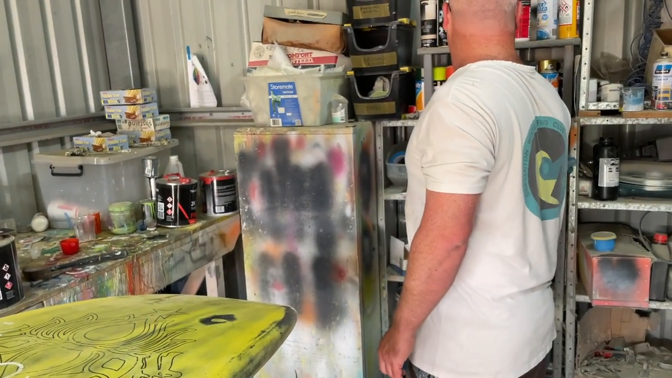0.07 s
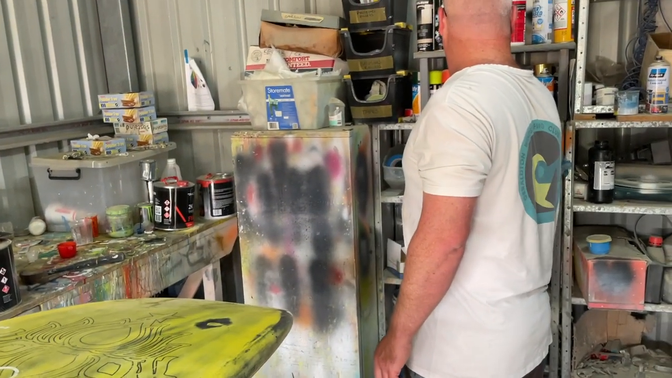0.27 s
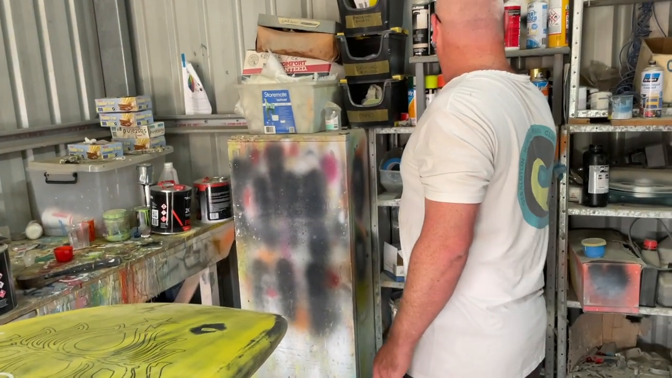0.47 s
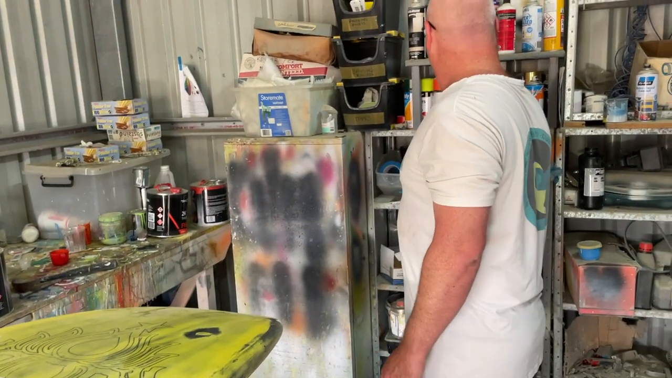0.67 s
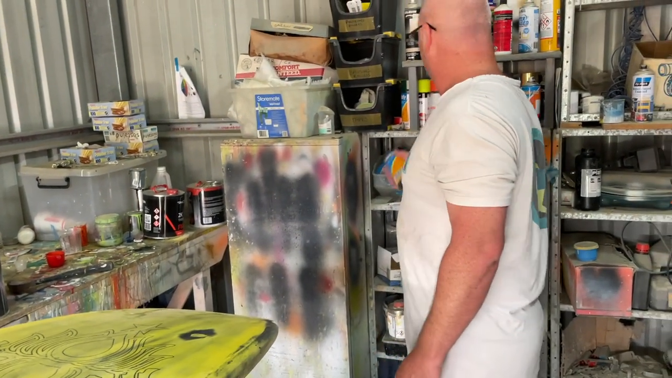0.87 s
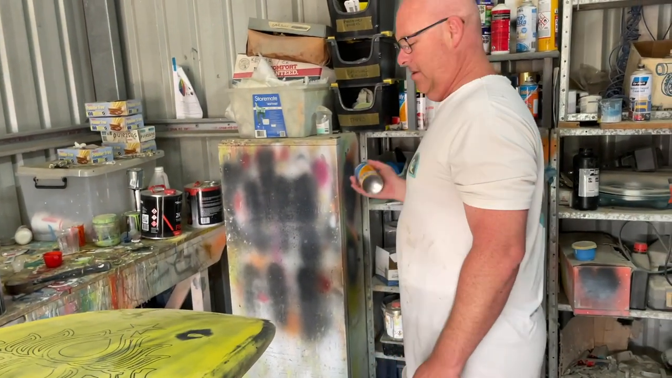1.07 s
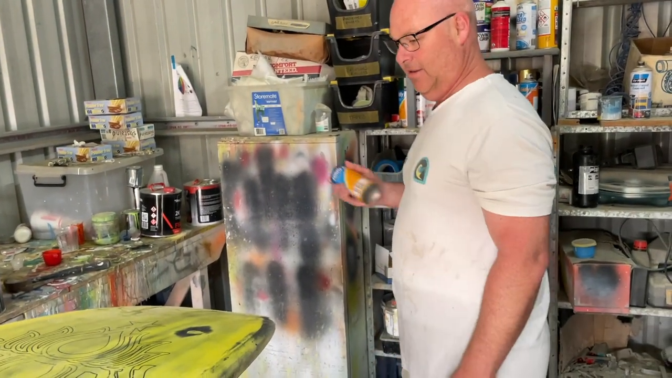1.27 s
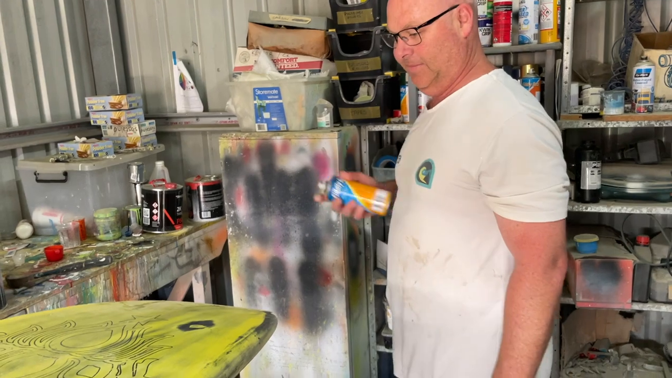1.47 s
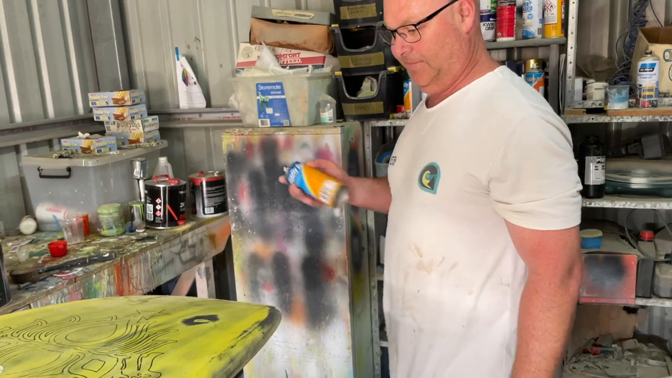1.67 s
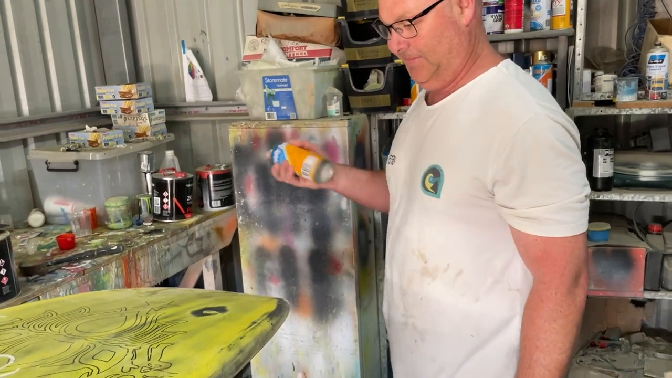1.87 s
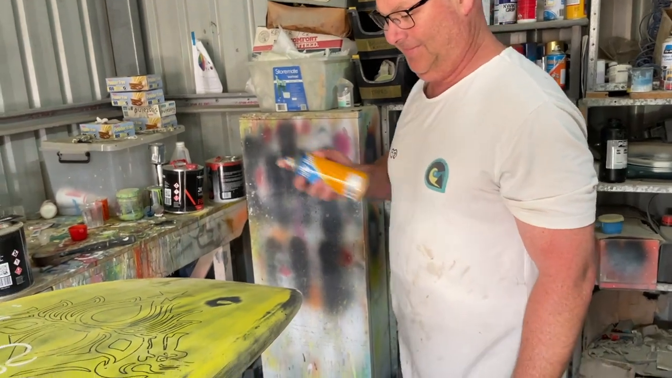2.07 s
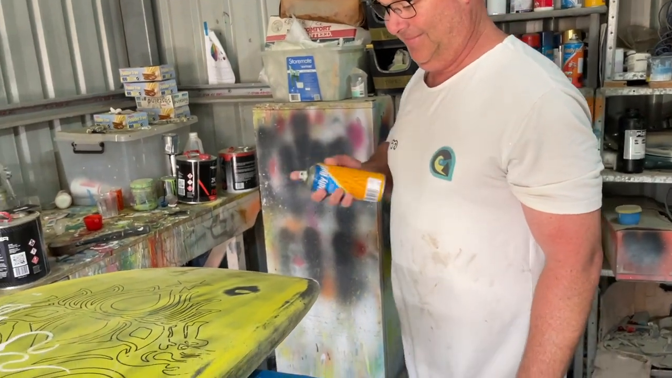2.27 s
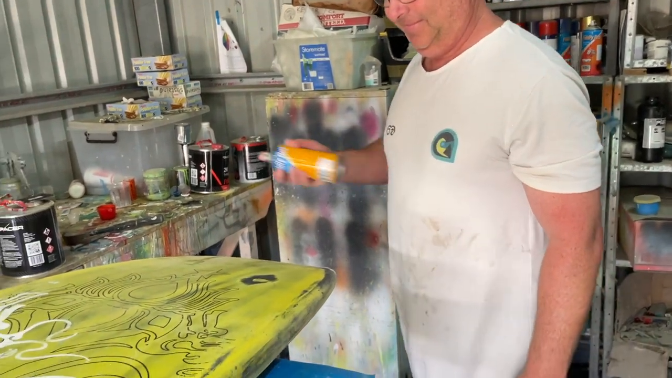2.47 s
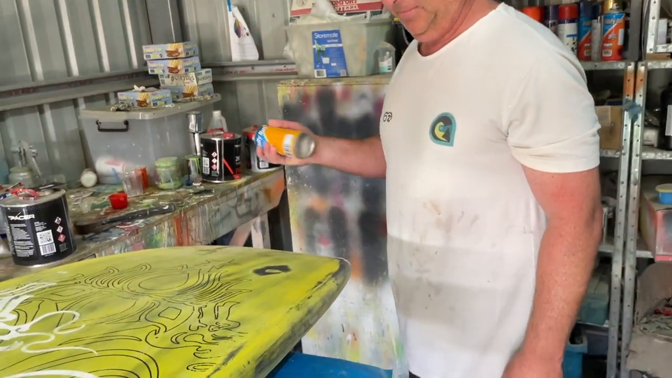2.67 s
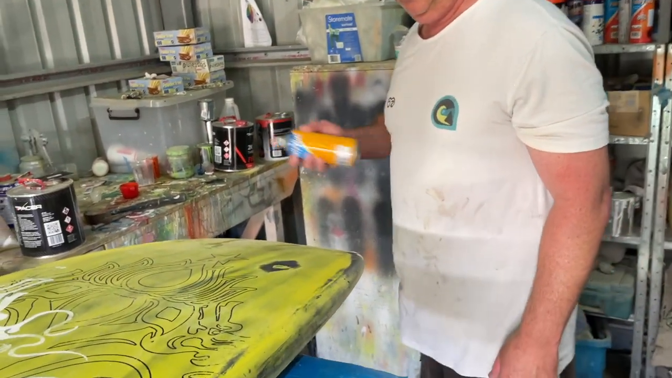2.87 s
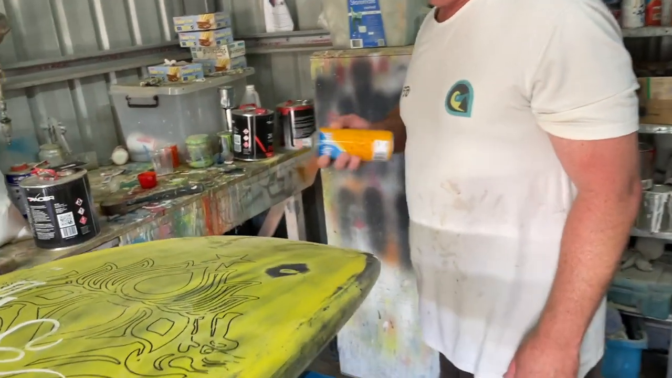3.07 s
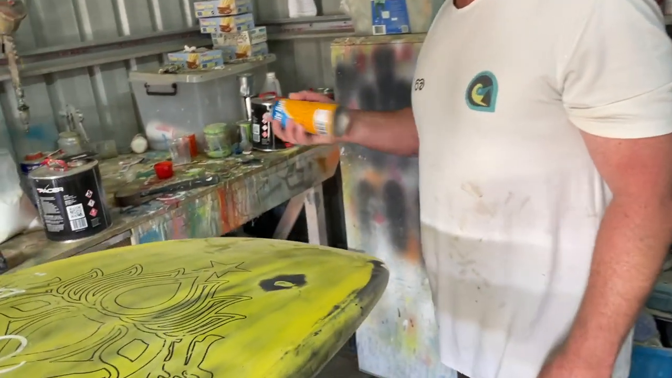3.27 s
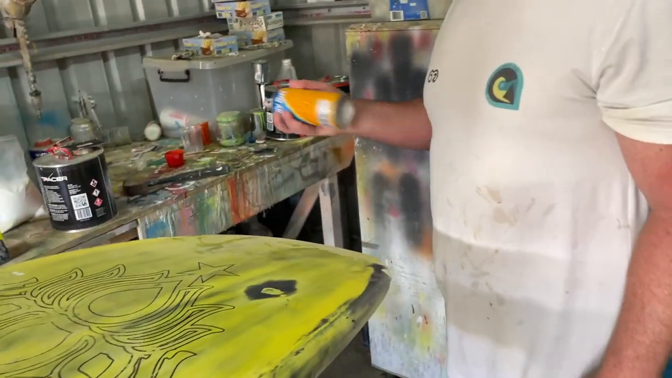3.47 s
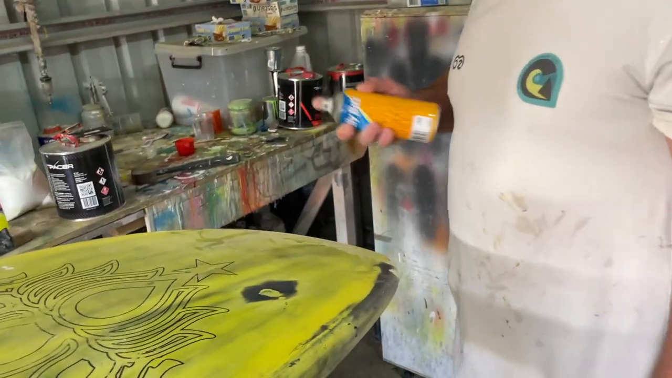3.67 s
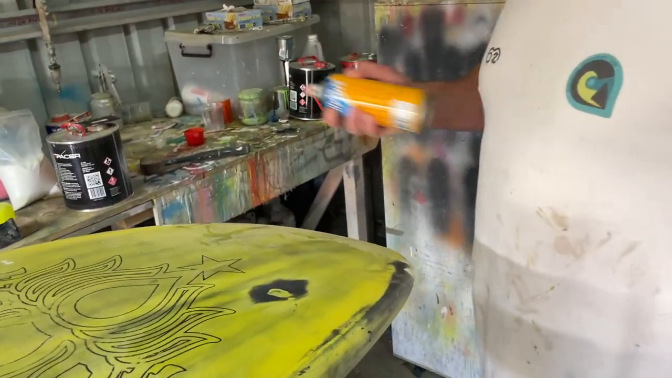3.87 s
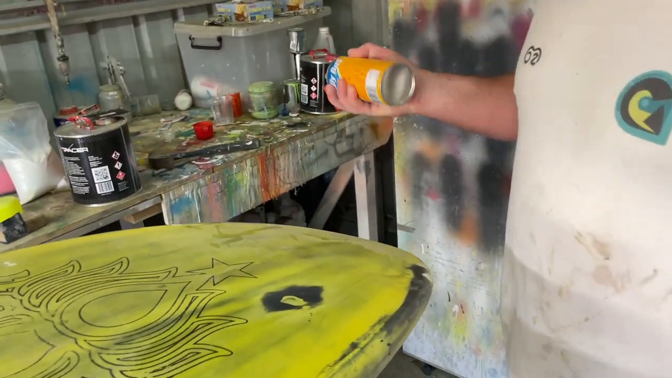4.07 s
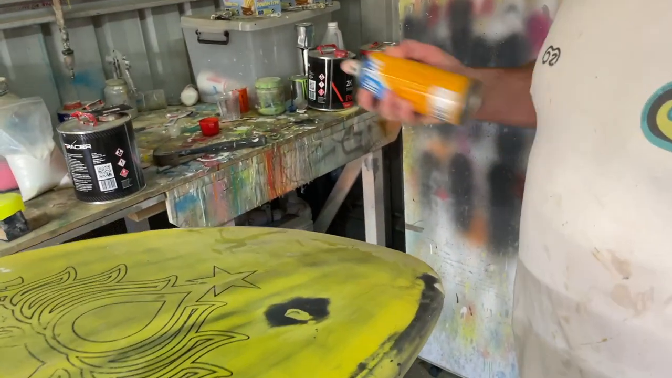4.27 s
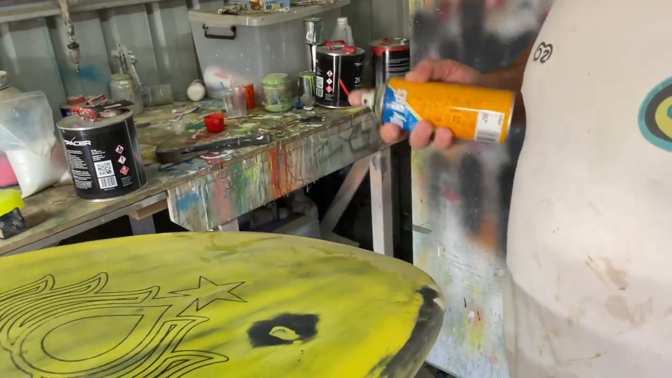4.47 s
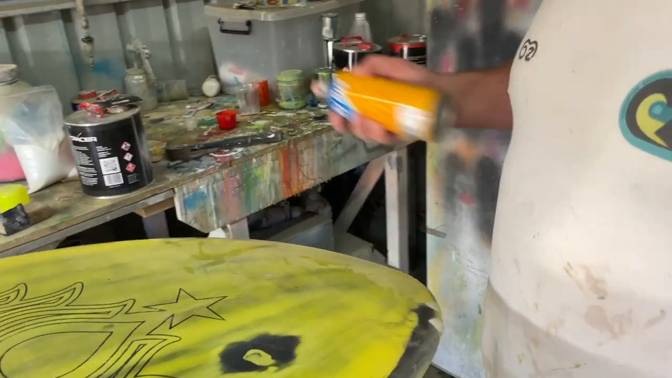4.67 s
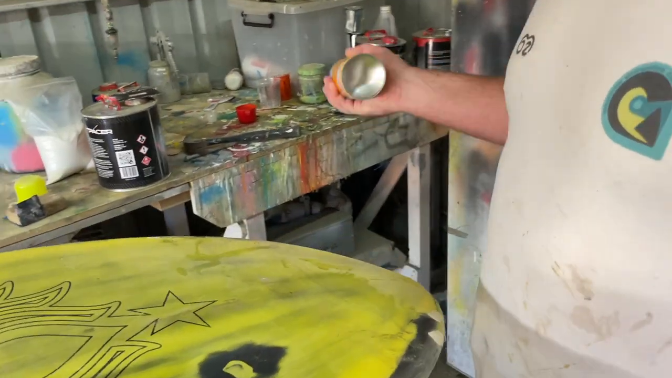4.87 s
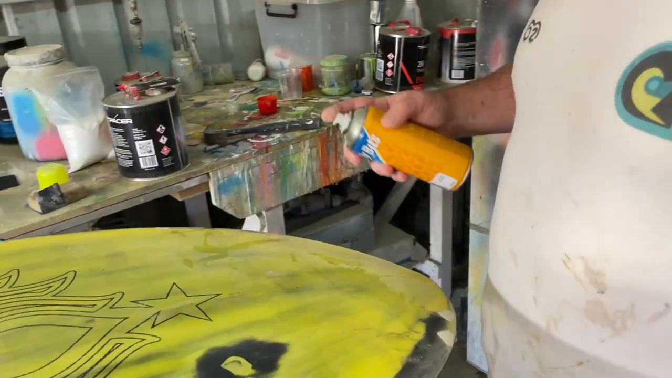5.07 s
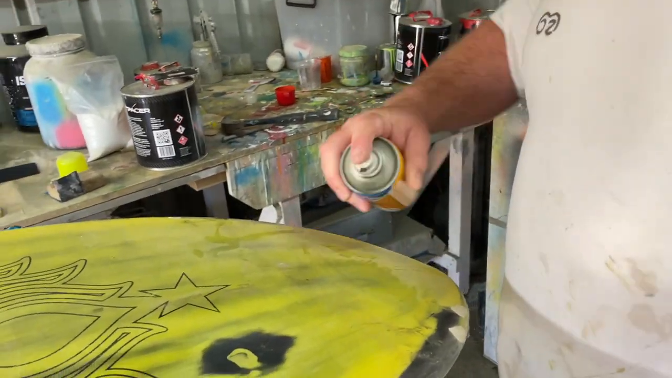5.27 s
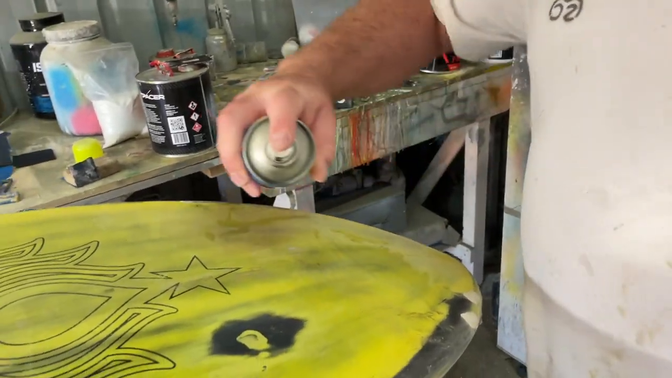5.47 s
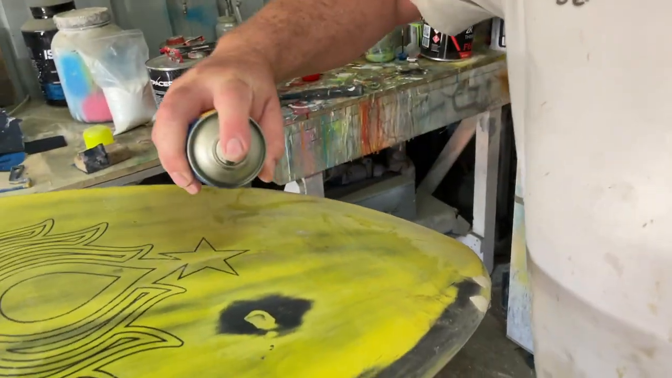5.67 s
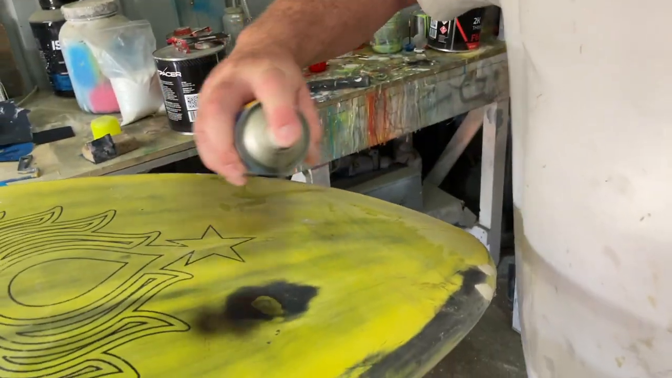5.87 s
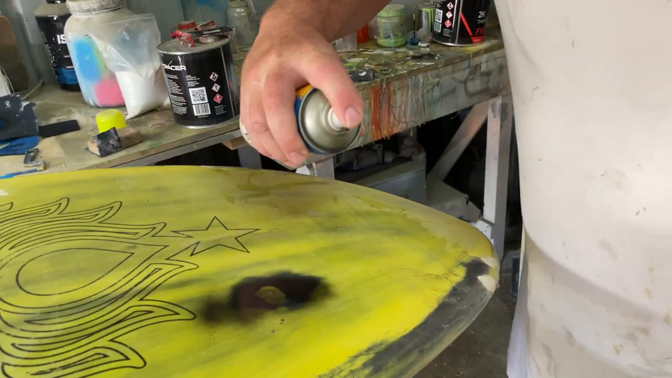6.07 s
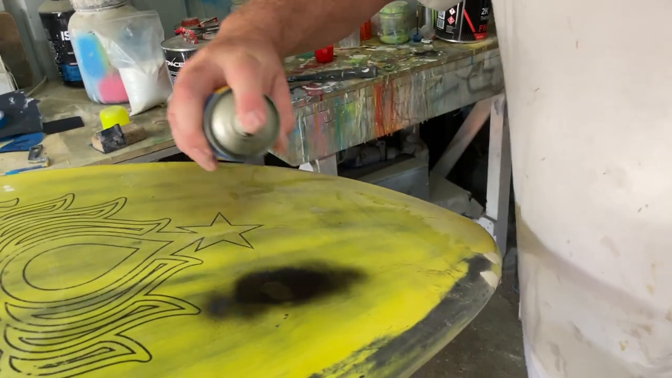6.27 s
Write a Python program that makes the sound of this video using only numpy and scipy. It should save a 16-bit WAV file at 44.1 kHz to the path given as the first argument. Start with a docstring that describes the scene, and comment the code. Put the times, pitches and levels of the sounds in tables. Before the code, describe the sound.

In a quiet metal shed with low, restless air, a shoe slides and lands on gritty floor. An aerosol paint can is then shaken rapidly, its mixing ball clacking between a bright base and a duller shoulder with small bounces and ringing echoes. The can comes nearer, the rattling stops with a short roll, and two brief sprays hiss close to a phone-like stereo microphone.

```python
"""Inside a tin workshop, over low restless air, a shoe slides, lands and turns on the gritty floor.
Then an aerosol paint can is shaken about 3.7 times a second: its mixing ball excites decaying modes and
wall noise as it clacks between bright domed base and duller shoulder, bounces, and grazes the side.
A faint hum swells and fades under the shaking, and the ball rolls along the wall as the can is aimed.
Last come two short bursts of spray, coloured noise gated by the valve, close to a phone's microphone pair."""
import sys
import numpy as np
from scipy import signal
from scipy.fft import rfft, irfft, next_fast_len
from scipy.io import wavfile
from scipy.ndimage import uniform_filter1d, map_coordinates

SR = 44100
rng = np.random.default_rng(int(sys.argv[2]) if len(sys.argv) > 2 else 0)


def master_out(mix):
    """Clip the mix to full scale and print it as 16-bit PCM to the path in sys.argv[1]."""
    frames = np.transpose(np.atleast_2d(mix))
    ceiling = np.clip(frames, -1, 1)
    pcm = np.round(ceiling * 32767).astype(np.int16)
    wavfile.write(sys.argv[1], SR, pcm)


N = 278050

# The quiet shed's air. Each row: frequency in Hz, relative density in dB per Hz.
AIR_SPECTRUM = [(15, -58.5), (25, -23), (48, -5), (62, -6), (106, -7.5), (142, -8.5), (181, -13.5),
                (231, -9.5), (501, -24.5), (1210, -31.5), (15000, -84)]
# Level of that air before its slow drift. Each row: time in seconds, level in dB.
AIR_LEVEL = [(0, -56.5), (3, -58), (5.6, -55), (6.3, -57.5)]
# How long the shed rings. Each row: frequency in Hz, t60 in seconds.
SHED_T60 = [(150, 0.54), (400, 0.93), (900, 0.85), (2100, 0.69), (4800, 0.56), (6300, 0.76), (9000, 0.28),
            (15000, 0.29)]
# Strength of the shed's echoes by pitch. Each row: frequency in Hz, relative echo in dB.
WALL_ECHO = [(200, 2), (800, 3.5), (1600, 7.5), (2100, 4), (2800, 5.5), (5000, -0.5), (9000, 0), (15000, 2)]
# Left-right likeness of diffuse sound. Each row: frequency in Hz, correlation from 0 to 1.
LIKENESS = [(100, 0.95), (500, 0.29), (1500, 0.17), (5000, 0.31), (6800, .4), (7800, 0.81), (15000, 1)]
# The can comes nearer, so the shed answers less. Each row: time in seconds, echo offset in dB.
APPROACH = [(.8, 3), (3.3, -3), (4.3, -1), (5.2, -8.5)]

# Phase between the two microphones. Each row: frequency in Hz, lead of the left in radians.
PORT_PHASE = [(1600, 0), (2400, 1), (5300, 1), (5800, -1), (7000, -1.8), (7900, -2.9), (9200, -3.3),
              (11300, -4.8), (12500, -6.2), (15000, -6.28)]
# Balance of the two microphones. Each row: frequency in Hz, left over right in dB.
PORT_BALANCE = [(300, 0), (900, -2), (2000, -.5), (3300, 3.3), (5000, 4.6), (7000, 3.5), (7900, 0)]
TOP_HZ = 15900  # the microphones' band limit

# The faint hum's level before its flutter. Each row: time in seconds, level in dB.
HUM_LEVEL = [(2.3, -87), (2.9, -60.5), (3.3, -65), (4.2, -69.5), (4.7, -79.5)]
# The ball rolls to rest; level before its grain. Each row: time in seconds, level in dB.
ROLL_LEVEL = [(4.95, -73), (5.15, -51), (5.4, -55), (5.55, -59.5), (5.72, -71), (5.9, -100)]
# Colour of the rolling. Each row: frequency in Hz, relative density in dB per Hz.
ROLL_SPECTRUM = [(300, -6), (800, 0), (1400, -2.5), (2500, -2.5), (3300, -11.5), (5000, -11.5),
                 (6200, -24.5), (13000, -18), (15700, -29.5)]

# The shoe's sole on the floor. Each row: frequency in Hz, relative density in dB per Hz.
SOLE_SPECTRUM = [(60, -24), (110, -9), (170, -7), (260, -2), (350, 0), (520, -2), (750, -3), (950, -2),
                 (1200, -9), (1600, -10), (2800, -20), (4000, -23), (6000, -50)]
# Grit under the sole. Each row: frequency in Hz, relative density in dB per Hz.
GRIT_SPECTRUM = [(1200, -11), (2500, -2), (4500, -2), (7000, -4.5), (13000, -8.5), (16000, -26)]
# the shoe lands at this time, and slides for this long before (s)
STEP_S, SLIDE_S = .505, 0.082
# landing, slide, grit at the landing, grit as the foot turns (dB)
LAND_DB, SLIDE_DB, GRIT_DB, TURN_DB = -27.5, -39, -44, -61.5
# the landing's rise and decay (s)
LAND_RISE_S, LAND_T60 = 0.0042, 0.25
# after the landing: when the foot turns fastest and when it stops (s)
TURN_PEAK_S, TURN_S = 0.25, 0.52

# The nozzle is pressed. Each row: start in seconds, time to open fully in seconds, shut in seconds,
# level in dB before flutter and echo.
BURSTS = [(5.722, 0.043, 5.916, -30.5), (6.076, 0.083, 6.28, -30.5)]
# Hiss of the jet. Each row: frequency in Hz, relative density in dB per Hz.
JET_SPECTRUM = [(150, -8.5), (500, -14), (900, -10.5), (1800, -10.5), (2700, -14), (3700, -9),
                (5000, -14.5), (6200, -4.5), (7600, -2), (9300, -1.5), (10800, 5.5), (12300, -4.5),
                (13500, 4), (15700, -7)]
# The jet flutters on the board. Each row: frequency in Hz, relative density in dB per Hz.
PUSH_SPECTRUM = [(60, -23), (150, -7), (280, 5), (450, -18), (900, -32)]
PUSH_DB = -24.5  # that flutter's middle level, relative to the hiss (dB)
CLOSE_S = 0.041  # the finger eases off this long before the valve is shut (s)

# The ball glances hard off the side where the hand damps it. Each row: time in seconds,
# relative level in dB, pitch of the strongest mode in Hz.
SIDE_TAPS = [(0.918, -13, 1940), (1.299, -18, 2050), (2.67, -19.5, 1430), (3.072, -11, 2100),
             (3.371, -9, 2010), (3.381, -16.5, 1960), (5.015, -17, 1540), (5.042, -21.5, 1440)]
# Modes of the side. Each row: frequency in Hz, relative level in dB, t60 in seconds.
SIDE_MODES = [(916, -17, 0.012), (1290, -2, 0.0045), (2100, -3, 0.018), (4770, -11, 0.0049),
              (7800, -8.5, 0.0038), (12500, -4, .002)]
# in mid flight the ball grazes the side: time before the next blow and its spread (s)
GRAZE_LEAD_S, GRAZE_SPREAD_S = 0.05, 0.011
# middle of the grazes' relative level (dB) and pitch (Hz)
GRAZE_DB, GRAZE_HZ = -22.5, 1955

# Broad modes of the shoulder. Each row: frequency in Hz, relative level in dB, t60 in seconds.
SHOULDER_MODES = [(805, -16.5, 0.0068), (1373, -11.5, 0.01), (2194, 0.5, 0.0056), (3530, -3.5, 0.002),
                  (4510, -3.5, 0.0033), (7970, 2, 0.0027), (10340, -0.5, 0.0017), (13400, 7.5, 0.0018),
                  (15200, -15.5, 0.0026)]
# The thin wall's countless modes, excited from the shoulder. Each row: frequency in Hz,
# relative density in dB per Hz.
SHOULDER_WALL = [(250, -26.5), (700, 1.5), (1400, -2.5), (2400, 0), (3100, -1.5), (4900, -2), (5800, -17),
                 (7800, -3), (10000, -12.5), (13000, -10), (15700, -38)]
# The ball is thrown back against the shoulder. Each row: time in seconds, relative blow in dB,
# low knock in dB relative, wall ring in dB relative, bounce in seconds later, relative bounce in dB.
SHOULDER_STROKES = [(0.827, -31.5, 3, 9.5, 0.037, -18.5), (0.982, -9, -1.5, 0, 0.04, -8.5),
                    (1.255, -11.5, -1.5, 8, 0.0061, -10), (1.514, -10.5, -12, 3, 0.012, -11),
                    (1.788, -4.5, 0.5, -14.5, 0.012, -13), (2.046, -8, -5, 2, .006, -16),
                    (2.311, -5, -3, -0.5, 0.0097, -26), (2.564, -10.5, -1, 4.5, 0.0051, -10.5),
                    (2.831, -7, -2, -1.5, 0.0029, -11.5), (3.115, -7, -8, -1.5, 0.0067, -7.5),
                    (3.4, -8, -6, -1, 0.03, -8.5), (3.682, -9.5, -10.5, -2, .003, -8.5),
                    (3.957, -7, -1.5, -0.5, 0.0075, -8), (4.222, -6, -7.5, 1, 0.014, -10.5),
                    (4.503, -6.5, 0.5, -4, .017, -7), (4.756, -7, -10.5, 1, 0.0072, -6),
                    (4.975, -18.5, -4, -5, .011, -12), (5.151, -7.5, -3, -11.5, 0.0087, -7),
                    (5.247, -19, -25, -2.5, 0.042, -31), (5.526, -31.5, 2.5, -0.5, 0.0065, -50)]
# a bounce on the shoulder: its low knock and its wall ring (dB relative)
BOUNCE_KNOCK_DB, BOUNCE_RING_DB = -6, -3

# Broad modes of the base, damped by paint and hand. Each row: frequency in Hz, relative level in dB,
# t60 in seconds.
BASE_MODES = [(800, -21.5, 0.0062), (1410, -17, 0.0039), (2712, -12.5, 0.0046), (3780, 0.5, 0.0034),
              (4420, -8.5, 0.0063), (5040, 1, 0.0052), (6890, 2.5, 0.0023), (9180, -1.5, 0.0045),
              (11640, -16.5, 0.0013)]
# The thin wall's countless modes, excited from the base. Each row: frequency in Hz,
# relative density in dB per Hz.
BASE_WALL = [(250, -35.5), (700, -31), (1600, -12.5), (2600, -4.5), (3800, -11), (4950, 5.5), (5800, -6),
             (7100, -5), (9400, -19.5), (11000, -16.5), (13500, -21), (15700, -43)]
# The ball is thrown against the domed base. Each row: time in seconds, relative first blow in dB,
# relative chatter in dB, one further bounce in seconds after the first blow, relative further bounce in dB.
BASE_STROKES = [(0.896, -12.5, -10.5, 0.064, -27), (1.09, -7, 0, 0.023, -9), (1.357, -14, 2.5, .081, -6),
                (1.643, -7, -2, .007, -3.5), (1.904, -9, -5.5, 0.0063, 0), (2.16, -3, -8, .003, -7.5),
                (2.429, -4, 1, .013, -11), (2.696, -4.5, -1.5, 0.031, -2), (2.97, -3, 0, 0.0081, 0),
                (3.248, 0.5, -5.5, 0.021, -9.5), (3.534, -4.5, -3.5, 0.0046, -2),
                (3.792, -1, 2.5, 0.015, -7.5), (4.077, 1, -3.5, 0.058, -13), (4.351, -4, 2, 0.09, -8.5),
                (4.599, -1.5, -0.5, 0.059, -5), (4.882, 0, 2, 0.1, -10)]
# chatter in the dome's rim: middle first flight (s), middle growth from flight to flight
CHATTER_S, CHATTER_GROWS = .0068, 1.8
# first chatter bounce relative to the row's chatter, and loss a bounce (dB)
CHATTER_DB, CHATTER_LOSS_DB = -6.5, 5
# wall ring of the first blow, of the chatter and of the further bounce (dB relative)
FIRST_RING_DB, CHATTER_RING_DB, FURTHER_RING_DB = -1.5, 3, -3.5
# the low knock of a blow on the base and its spread from blow to blow (dB)
BASE_KNOCK_DB, KNOCK_SPREAD_DB = 0, 5.5

# middle pitch given to each end's most energetic mode (Hz), and its spread with the spot hit (share)
BASE_HZ, SHOULDER_HZ, SPOT_SPREAD = 4744, 2150, 0.053
TICK_DB = -10  # the spike of a blow, relative to its ring (dB)


def amp(db):
    """Decibels to gain."""
    return 10 ** (np.asarray(db) / 20)


def unit(x):
    """x at rms 1."""
    return x / np.sqrt(np.mean(x ** 2) + 1e-20)


def along(points, hz):
    """(Hz, value) points read on a log axis."""
    f, v = np.transpose(points)
    return np.interp(np.log(hz + 1), np.log(f + 1), v)


def curve(rows):
    """One value per sample from (seconds, value) rows."""
    s, values = np.transpose(rows)
    return np.interp(np.arange(N) / SR, s, values)


def wobble(rate):
    """A smooth random curve, rate knots a second."""
    knots = rng.standard_normal(int(N * rate / SR) + 4)
    return map_coordinates(knots, [np.arange(N) * rate / SR])


def filtered(x, response):
    """x times a response of frequency."""
    n = x.shape[-1]
    m = next_fast_len(n + 4096, True)
    return irfft(rfft(x, m) * response(np.fft.rfftfreq(m, 1 / SR)), m)[..., :n]


def noise(spectrum):
    """One channel of coloured noise at rms 1."""
    return unit(filtered(rng.standard_normal(N), lambda hz: amp(along(spectrum, hz))))


def treble(x, low_hz):
    """x with what lies below low_hz rolled off."""
    return signal.sosfilt(signal.butter(2, low_hz, "high", fs=SR, output="sos"), x)


def diffuse(pair):
    """Two unrelated signals become a left and right that are partly alike."""
    def shares(hz):
        turn = np.arccos(np.clip(along(LIKENESS, hz), -1, 1)) / 2
        return np.array([np.cos(turn), np.sin(turn)])
    mid, side = filtered(pair, shares)
    return np.array([mid + side, mid - side])


def add(track, s, x):
    """Mix x into the track at s seconds."""
    start = max(round(s * SR), 0)
    track[:, start:start + x.shape[-1]] += x[..., :N - start]


def in_shed(x, wet_db, near_db=4):
    """x with the shed's answer: strong echoes off bench and board, then a tail longest in the mids."""
    gap_s, near_s = .006, .02
    hz, t, z = signal.stft(rng.standard_normal((2, SR // 2)), SR, nperseg=256)
    late_db = along(WALL_ECHO, hz)[:, None] - 60 * t / along(SHED_T60, hz)[:, None]
    fade_db = late_db + near_db * np.exp(-t / near_s)
    tail = diffuse(signal.istft(z * amp(fade_db), SR, nperseg=256)[1])
    # the nearest surfaces are about a metre away, so the echoes set in after a short gap
    tail = tail * (1 - np.exp(-(np.arange(tail.shape[1]) / SR / gap_s) ** 2))
    paths = amp(wet_db) * tail / np.linalg.norm(tail[0])
    paths[:, 0] += 1  # the direct path
    return signal.fftconvolve(x[None], paths, axes=1)


def air():
    """The shed's air: low coloured noise, diffuse and slightly restless."""
    level_db = curve(AIR_LEVEL)
    drift_db = 1.3 * wobble(4)
    return amp(level_db + drift_db) * diffuse(np.array([noise(AIR_SPECTRUM), noise(AIR_SPECTRUM)]))


def hum(pitch_hz=280, waver=0.61):
    """A faint hum under the shaking: one sine whose phase (waver in radians) and level wander."""
    level_db = curve(HUM_LEVEL) + 2.4 * wobble(13)
    phase = 2 * np.pi * pitch_hz * np.arange(N) / SR + waver * wobble(21)
    return amp(level_db) * np.sqrt(2) * np.sin(phase)


def footstep(grain_db=3):
    """Friction noise: a sole slides over the gritty floor, lands, and turns on the grit."""
    t = np.arange(N) / SR - STEP_S
    slide = np.interp(t, [-SLIDE_S, 0, LAND_RISE_S], [0, 1, 0])
    fade_db = -60 * np.maximum(t - LAND_RISE_S, 0) / LAND_T60
    land = np.clip(t / LAND_RISE_S, 0, 1) * amp(fade_db)
    turn = np.interp(t, [0, TURN_PEAK_S, TURN_S], [0, 1, 0]) * amp(3.1 * wobble(39.5))
    sole_level = amp(SLIDE_DB) * slide + amp(LAND_DB) * land
    grit_level = amp(GRIT_DB - LAND_DB) * sole_level + amp(TURN_DB) * turn
    grit = unit(noise(GRIT_SPECTRUM) * amp(grain_db * wobble(600)))
    return in_shed(sole_level * noise(SOLE_SPECTRUM) + grit_level * grit, wet_db=-17)[:, :N]


def roll(grain_db=3):
    """The ball rolls out along the wall as the can is turned to aim: grainy diffuse noise."""
    level_db = curve(ROLL_LEVEL) + grain_db * wobble(76)
    return amp(level_db) * diffuse(np.array([noise(ROLL_SPECTRUM), noise(ROLL_SPECTRUM)]))


def spray(sputter_db=1.4, crack_open=0.21, patchy_db=2, snap_s=0.0034):
    """The jet hisses as far as the valve is open; droplets make it flutter and its colour shifts."""
    t = np.arange(N) / SR
    z = signal.stft(noise(JET_SPECTRUM), nperseg=512)[2]
    patches = uniform_filter1d(rng.standard_normal(z.shape), size=6, axis=0)
    patches = uniform_filter1d(patches, size=8, axis=1)
    hiss = signal.istft(z * amp(patchy_db * unit(patches)), nperseg=512)[1][:N]
    hiss = hiss * amp(sputter_db * wobble(250))
    low = filtered(hiss, lambda hz: 1 / (1 + (hz / 7000) ** 8))
    push = amp(PUSH_DB + 3.4 * wobble(30)) * noise(PUSH_SPECTRUM)
    out = np.zeros((2, N))
    for start, open_s, shut, db in BURSTS:
        times = [start, start + snap_s, start + open_s, shut - CLOSE_S, shut - snap_s, shut]
        flow = amp(db) * np.interp(t, times, [0, crack_open, 1, 1, .4, 0])
        # the nozzle beams its treble at the microphones, the lower hiss comes by way of the walls
        add(out, 0, in_shed(flow * (low + push), wet_db=-10))
        add(out, 0, in_shed(flow * (hiss - low), wet_db=-15))
    return out


def skitter(size_db=-13, spread_db=5, span_s=.08, fade_db=9, count=4):
    """Light irregular touches, fading on average, as the ball runs along the wall after a blow."""
    train = np.zeros(SR // 4)
    late = rng.uniform(.03, 1, count)  # share of the span
    at = np.minimum(late * span_s * SR, len(train) - 1).astype(int)
    train[at] = amp(size_db + spread_db * rng.standard_normal(count) - fade_db * late)
    return train


def clack(modes, knock_db, main_hz, scatter_db=3.0, detune=0.027, contact_s=0.00039,
          crack_db=-16, crack_t60=0.011, split_hz=2700, low_hz=380):
    """One contact at energy 1: decaying modes and a noise crack; the spot hit shifts the modes."""
    t = np.arange(SR // 40) / SR
    hz, db, t60 = np.transpose(modes)[..., None]
    strength, shift = rng.standard_normal((2, len(modes), 1))
    energy = amp(db) ** 2 * t60
    main = energy == energy.max()
    hz = np.where(main, main_hz, hz * (1 + detune * shift))
    db = db + scatter_db * strength + knock_db * (hz < split_hz)
    sines = np.sin(2 * np.pi * (hz * t + rng.random(hz.shape)))
    ring = np.sum(amp(db - 60 * t / t60) * sines, axis=0)
    crack = amp(crack_db - 60 * t / crack_t60) * rng.standard_normal(len(t))
    blow = (ring + crack) * (1 - np.exp(-(t / contact_s) ** 2))
    blow = treble(blow, low_hz)  # so small a can radiates little bass
    return blow / np.linalg.norm(blow)


def grazes(spread_db=3, pitch_spread=0.16):
    """While the can is shaken, the ball brushes the side on its way to each end: (s, dB, Hz)."""
    first_s, last_s = BASE_STROKES[0][0], BASE_STROKES[-1][0]
    blows = [s for s, *_ in BASE_STROKES + SHOULDER_STROKES if first_s < s <= last_s]
    taps = []
    for s in blows:
        when, force, spot = rng.standard_normal(3)
        graze_s = s - GRAZE_LEAD_S + GRAZE_SPREAD_S * when
        taps.append((graze_s, GRAZE_DB + spread_db * force, GRAZE_HZ * np.exp(pitch_spread * spot)))
    return taps


def side_taps(level_db=10, skid_db=-9, skid_s=.022):
    """Short dull pings of the can's side; the ball skids on for a moment after each."""
    out = np.zeros((2, N))
    for s, db, pitch_hz in SIDE_TAPS + grazes():
        touches = skitter(size_db=skid_db, span_s=skid_s)
        ping = clack(SIDE_MODES, 0, pitch_hz)
        skid_hz = GRAZE_HZ * np.exp(0.13 * rng.standard_normal())
        contacts = signal.fftconvolve(clack(SIDE_MODES, 0, skid_hz), touches)
        contacts[:len(ping)] += ping
        add(out, s, amp(db + level_db) * in_shed(contacts, wet_db=-7, near_db=11))
    return out


def tick(t, low_hz=9000, life_s=0.00037):
    """The instant of hard contact: a sharp treble spike at energy 1."""
    spike = treble(rng.standard_normal(len(t)) * t * np.exp(-t / life_s), low_hz)
    return spike / np.linalg.norm(spike)


def wall_ring(spectrum, t60, swell_s=0.00148, ripple_db=6.0, ripple_hz=170):
    """The wall's dense metallic crash as decaying noise; each blow favours other clusters of modes."""
    t = np.arange(SR // 3) / SR
    favour = rng.standard_normal(len(t))

    def colour(hz):
        ripple = np.interp(hz / ripple_hz, np.arange(len(t)), favour)
        return amp(along(spectrum, hz) + ripple_db * ripple)
    crash = diffuse(filtered(rng.standard_normal((2, len(t))), colour))
    crash = crash * amp(-60 * t / t60) * (1 - np.exp(-t / swell_s))
    return crash / np.linalg.norm(crash[0])


def rattle(hits, modes, wall, pitch_hz, level_db, wet_db, wall_db, wall_t60, rebound_db, rebound_s):
    """The ball's blows on one end of the can; the can moves, so each has new echoes."""
    out = np.zeros((2, N))
    for s, db, knock_db, ring_db in hits:
        main_hz = pitch_hz * (1 + SPOT_SPREAD * rng.standard_normal())
        blow = clack(modes, knock_db, main_hz)
        blow = blow + amp(TICK_DB) * tick(np.arange(len(blow)) / SR)
        touches = skitter() * amp(ring_db)
        # the curved end throws the ball straight onto the wall
        touches[round(rebound_s * SR * rng.uniform(.5, 1))] += amp(rebound_db)
        contacts = signal.fftconvolve(clack(modes, knock_db, main_hz), touches)
        contacts[:len(blow)] += blow
        echo_db = wet_db + np.interp(s, *np.transpose(APPROACH))
        add(out, s, amp(db + level_db) * in_shed(contacts, echo_db, near_db=18.0))
        add(out, s, amp(db + level_db + wall_db + ring_db) * wall_ring(wall, wall_t60))
    return out


def shoulder_hits():
    """The weaker return throw lands and bounces once: (s, dB, knock dB, ring dB)."""
    hits = []
    for s, db, knock_db, ring_db, bounce_s, bounce_db in SHOULDER_STROKES:
        hits.append((s, db, knock_db, ring_db))
        hits.append((s + bounce_s, bounce_db, BOUNCE_KNOCK_DB, BOUNCE_RING_DB))
    return hits


def shoulder_clacks():
    """The ball strikes the duller shoulder, setting off its modes and the wall."""
    return rattle(shoulder_hits(), SHOULDER_MODES, SHOULDER_WALL, SHOULDER_HZ, level_db=8.5, wet_db=-4,
                  wall_db=-2.5, wall_t60=0.24, rebound_db=-4.5, rebound_s=0.0015)


def base_hits():
    """Each throw lands, chatters in longer hops as the hand slows, and bounces once more at its own moment."""
    hits = []  # (s, dB, knock dB, ring dB)
    for s, first_db, chatter_db, further_s, further_db in BASE_STROKES:
        knock_db = BASE_KNOCK_DB + KNOCK_SPREAD_DB * rng.standard_normal(size=4)
        hops = CHATTER_S * CHATTER_GROWS ** np.arange(2) * np.exp(.1 * rng.standard_normal(2))
        hits.append((s, first_db, knock_db[0], FIRST_RING_DB))
        for k, later_s in enumerate(np.cumsum(hops)):
            bounce_db = chatter_db + CHATTER_DB - CHATTER_LOSS_DB * k
            hits.append((s + later_s, bounce_db, knock_db[k + 1], CHATTER_RING_DB))
        # this bounce may come before, amid or after the chatter
        hits.append((s + further_s, further_db, knock_db[-1], FURTHER_RING_DB))
    return hits


def base_clacks():
    """The ball strikes the bright domed base, setting off its modes and the wall."""
    return rattle(base_hits(), BASE_MODES, BASE_WALL, BASE_HZ, level_db=9.5, wet_db=-3,
                  wall_db=-0.5, wall_t60=0.22, rebound_db=-4.5, rebound_s=.0028)


def scene():
    """Background, step, spray and the shaken can."""
    background = air() + hum()
    can = roll() + side_taps() + shoulder_clacks() + base_clacks()
    return background + footstep() + spray() + can


def record(dry):
    """The microphone pair splits phase and level between the sides and cuts steeply above its band."""
    def split(hz):
        half = amp(along(PORT_BALANCE, hz) / 2) * np.exp(1j * along(PORT_PHASE, hz) / 2)
        return np.array([half, 1 / half])
    pair = np.clip(filtered(dry, split), -1, 1)
    return filtered(pair, lambda hz: 1 / (1 + (hz / TOP_HZ) ** 80))


dry = scene()
out = record(dry)
master_out(out)
```